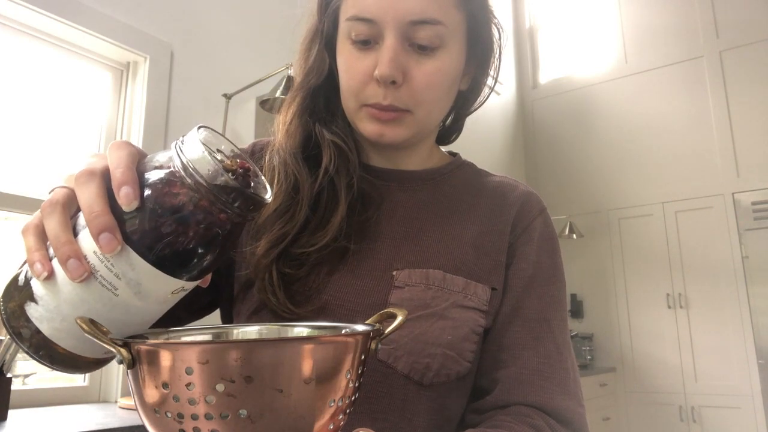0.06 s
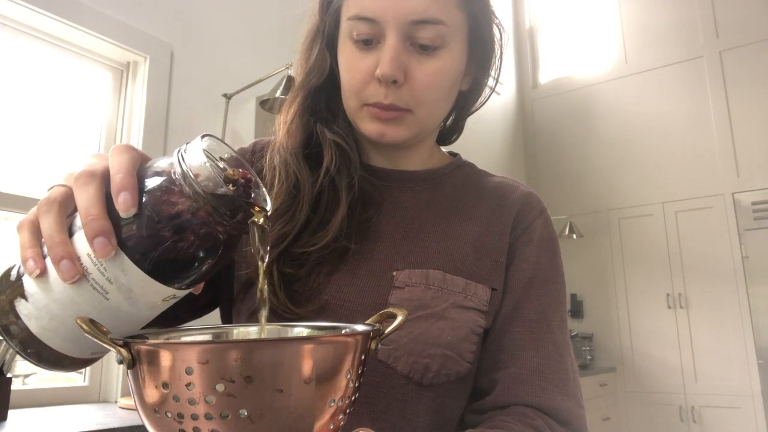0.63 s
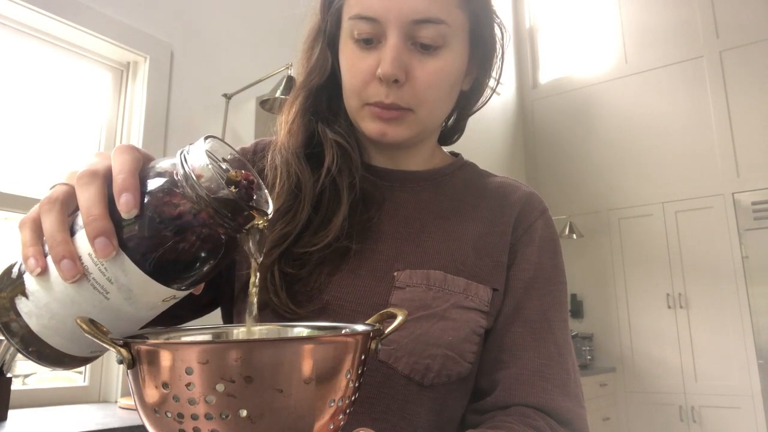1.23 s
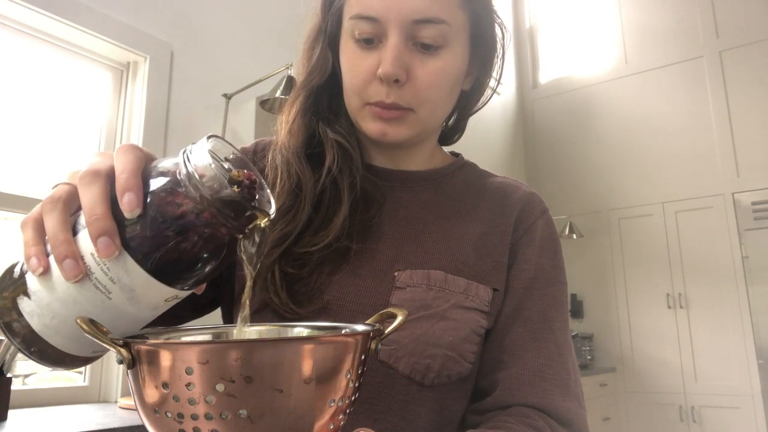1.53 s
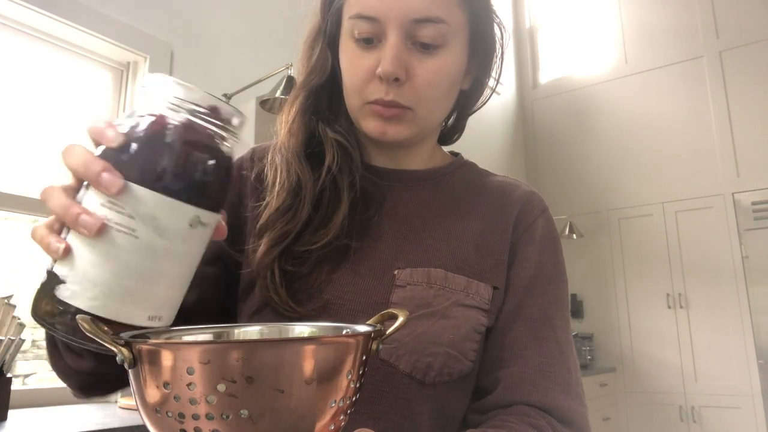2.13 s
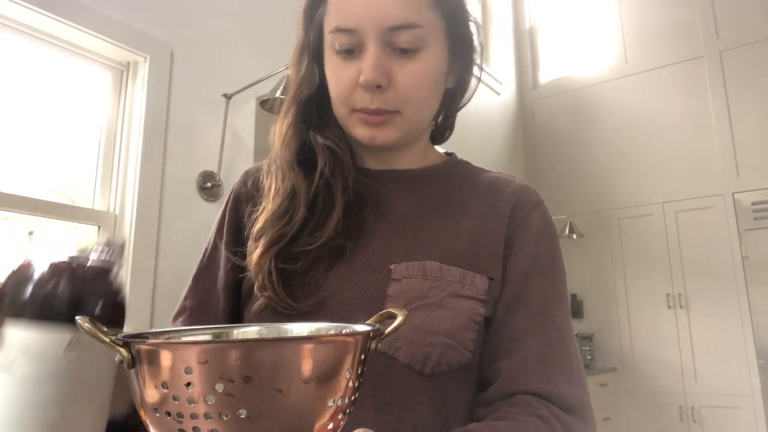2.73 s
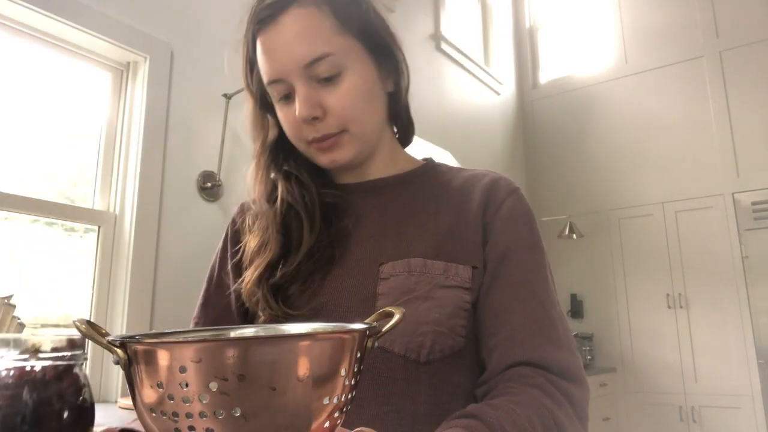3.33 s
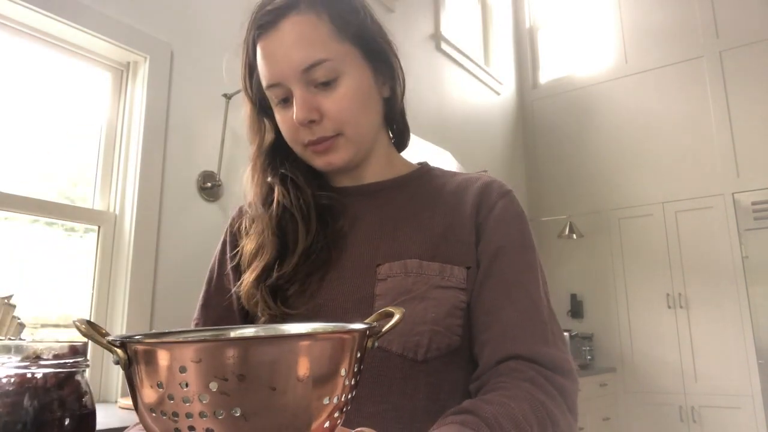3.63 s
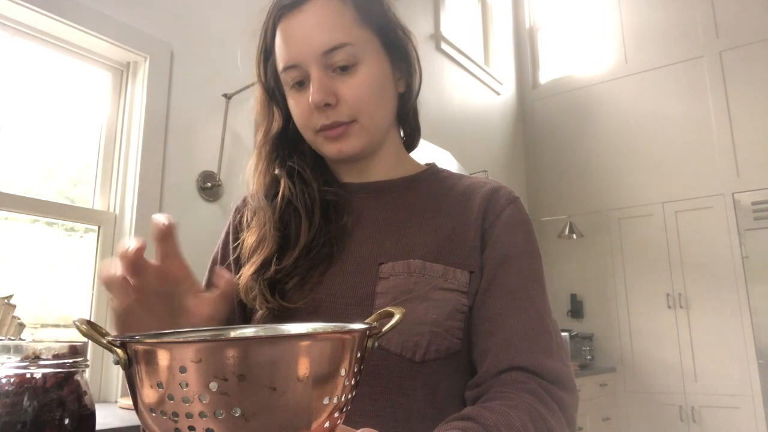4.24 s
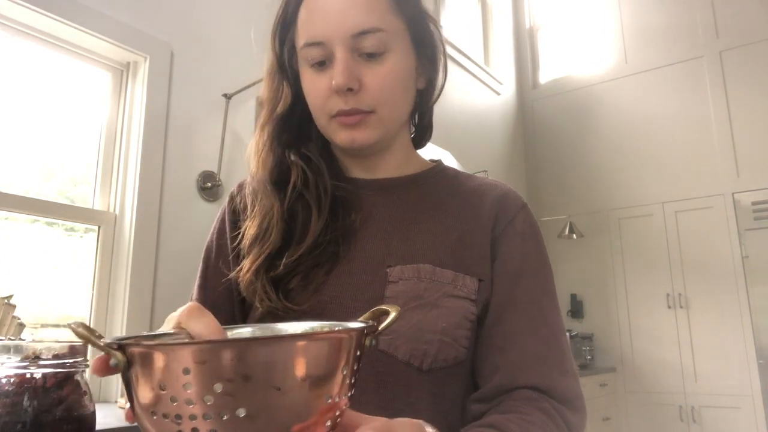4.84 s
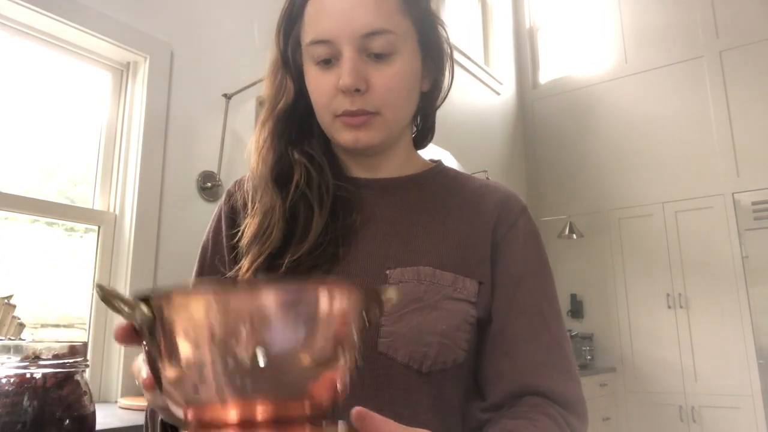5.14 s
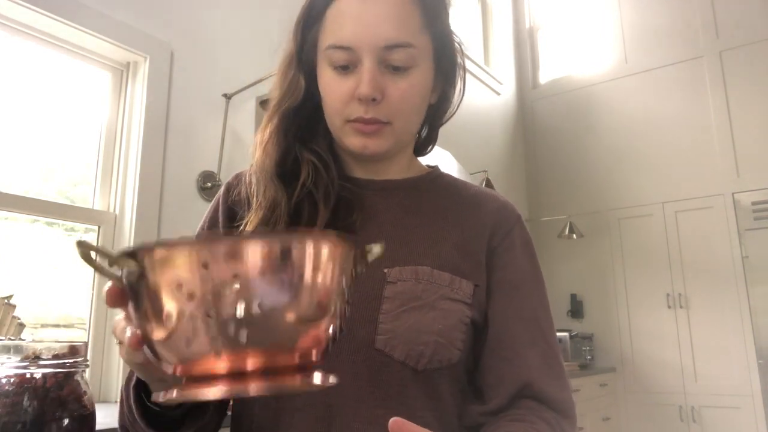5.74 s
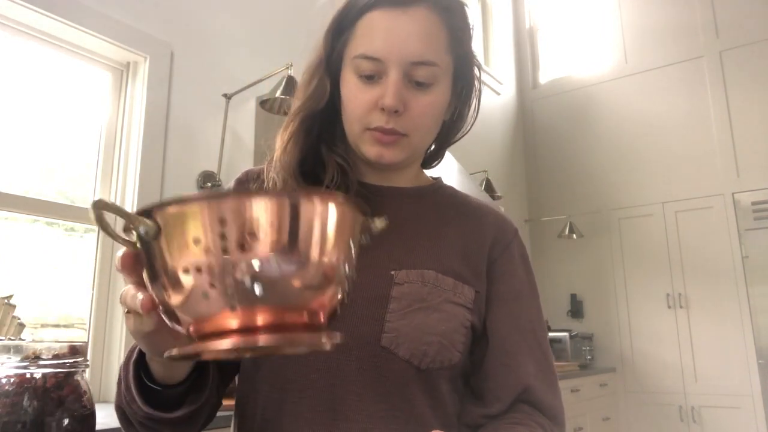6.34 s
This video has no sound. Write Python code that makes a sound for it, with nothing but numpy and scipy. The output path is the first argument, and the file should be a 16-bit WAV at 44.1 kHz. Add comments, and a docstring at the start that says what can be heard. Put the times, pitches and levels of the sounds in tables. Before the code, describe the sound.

In an echoing kitchen with a faint ventilation rumble, liquid trickles onto the wet bottom of a metal colander near the microphone, spattering and dwindling to drips. A glass jar clinks against the rim. After a short pause comes the loudest sound, a sharp wooden knock with a rattle and a softer thud. Fingers then tap and clink softly on the colander as it is picked up.

```python
"""A thin stream patters on a copper colander in a high, echoing kitchen, then thins to drops and plinks.
Poured from a jar, it drums on the wet bottom, throws spray and traps bubbles that snap and ring.
The jar bumps the rim as it is tipped back, ringing the wall and rocking the bowl.
Something knocks hard on wood; then the colander is grasped and lifted off with light clinks.
Ventilation rumbles faintly underneath."""
import sys
import numpy as np
from scipy import signal
from scipy.fft import rfft, irfft, next_fast_len
from scipy.io import wavfile

SR = 44100
rng = np.random.default_rng(int(sys.argv[2]) if len(sys.argv) > 2 else 0)


def to_wav(sig):
    """Store sig (one row per channel, or 1-D mono) as 16-bit WAV at the path in sys.argv[1].

    Samples outside -1..1 are clipped; the rate is SR.
    """
    pcm = np.clip(np.atleast_2d(sig), -1, 1) * 32767
    pcm = np.round(pcm).astype(np.int16)
    wavfile.write(sys.argv[1], SR, pcm.T)  # frames by channels


N = 289737
TIME_S = np.arange(N) / SR
AGE_S = TIME_S[:SR // 2]  # since a contact
POUR_S = TIME_S[:5 * SR // 2]  # while liquid falls
WET_DAMPING = 4.5  # the liquid film divides ring times by this

# fat lumps landing (time [s], splat peak [dB], thump peak [dB])
LUMP_HITS = [(0.544, -37, -37), (0.764, -47, -39), (0.814, -39.5, -43), (0.833, -42, -44),
             (0.857, -57, -37), (0.892, -37.5, -46), (0.902, -41, -51), (0.976, -48, -45),
             (1.011, -37.5, -36.5), (1.036, -47, -50), (1.055, -42.5, -42), (1.07, -48, -49),
             (1.171, -42, -49), (1.199, -42.5, -37), (1.24, -43.5, -58), (1.304, -43.5, -46),
             (1.5713, -39.5, -45), (1.682, -36, -39)]
# single drops landing (time [s], level [dB])
DROP_HITS = [(0.5088, -53.5), (0.542, -54.5), (1.342, -53), (1.401, -52), (1.417, -41.5), (1.437, -36.5),
             (1.5126, -45), (1.536, -42.5), (1.556, -49), (1.572, -44.5), (1.6134, -44), (1.63, -46),
             (1.669, -45), (1.681, -39), (1.757, -55), (1.861, -48)]
# lowest bottom mode, sinking under the liquid's weight (time [s], frequency [Hz])
LOADED_MODE = [(0.5, 1610), (1.34, 1594), (1.45, 1552), (1.62, 1524), (1.82, 1556)]
# higher bottom modes (frequency [Hz], level [dB], t60 [s])
BOTTOM_MODES = [(2930, -8, .02), (3190, 0, .03), (4030, -5, .035), (4960, -2, .042), (5700, -11, .04),
                (7210, -6, .08), (7390, -1, .13), (7616, 2, .085), (8380, -2, .08), (9750, -5, .04),
                (11200, -7, .035), (12600, -7, .025)]
# copper wall modes (frequency [Hz], level [dB], t60 [s])
WALL_MODES = [(307, -3, .5), (882, -9, .42), (1008, -4.5, .55), (1390, -1, .16), (1535, 3, .2),
              (1733, -10, .25), (2202, -2, .24), (2510, -3, .2), (3105, -5, .12), (3275, -2.5, .24),
              (3680, -5, .2), (4062, -1, .18), (4960, 0.5, .17), (5120, -8, .09), (5870, -14, .13),
              (7290, -7, .15), (7605, -5, .13), (8490, -12, .13), (9150, -6, .13), (10200, -9, .13),
              (11920, -12, .13)]


def stream():
    """Dense impacts drum on the wet metal, ring the bottom and throw spray, all following the flow."""
    # swell and break-off of the pour (time [s], patter [dB], spray [dB], lowest mode [dB])
    pour_levels = [(0.64, -80, -98, -82), (0.725, -55, -78, -85), (0.87, -55.5, -69.5, -69),
                   (1.2, -54, -71, -77), (1.36, -56.5, -69.5, -64.5), (1.46, -59, -69, -66),
                   (1.68, -55.5, -61, -66), (1.85, -59.5, -79, -86), (2.0, -96, -96, -81)]
    # spectra of impacts, small lumps, spray and mist (frequency [Hz], level [dB])
    patter_eq = [(120, -26.5), (230, -11), (335, 1.5), (420, -3.5), (700, -9), (920, -17), (1080, -13),
                 (1550, -17.5), (1900, -35), (3200, -29), (6000, -39.5)]
    spatter_eq = [(500, -11), (1100, 17), (1600, -2), (2100, -11), (3200, 4), (5000, -10), (8000, -27),
                  (15000, -34)]
    spray_eq = [(800, -6), (2000, 0), (3300, 9), (4400, 10), (5100, 13), (6500, -2), (7600, 0), (8700, -8),
                (10000, -1), (15500, 3)]
    mist_eq = [(3000, -44), (6500, -19), (7600, -25), (8800, -10), (10000, 3), (15500, 7)]
    times_s, *levels_db = np.transpose(pour_levels)
    flow_gain, spray_gain, ring_gain = (amp(np.interp(POUR_S, times_s, db)) for db in levels_db)
    patter = unit_rms(colour(grains(per_s=800, spread_db=2), patter_eq))
    spatter = unit_rms(colour(puffs(per_s=64, spread_db=1.5, t60_s=0.0098), spatter_eq))
    spray = unit_rms(colour(fizz(per_s=900, spread_db=2.8, q=9), spray_eq))
    mist = unit_rms(colour(fizz(per_s=380, spread_db=6, q=8.4), mist_eq))
    impacts = grains(per_s=250, spread_db=-5)
    low_hz = np.interp(POUR_S, *np.transpose(LOADED_MODE))
    low_ring = unit_rms(excite(impacts, fade(t60_s=0.074)) * glide(low_hz))
    high_ring = unit_rms(excite(impacts, strike(BOTTOM_MODES, scatter_db=4, t60_scale=1.3)))
    body = flow_gain * (amp(3) * patter + amp(-9.5) * spatter)
    treble = spray_gain * (amp(-3) * spray + amp(-1.5) * ticks() + amp(-8) * mist + amp(-11) * high_ring)
    return np.pad(necking() * (body + treble + ring_gain * low_ring), (0, N - len(POUR_S)))


def grains(per_s, spread_db, count=6000):
    """Tiny impacts of random time, size and sign."""
    gaps = rng.exponential(1, count)
    sizes = np.minimum(rng.exponential(1, count), 4)
    hits = amp(spread_db * sizes) * rng.choice([-1, 1], count)
    starts = (np.cumsum(gaps) / per_s * SR).astype(int)
    heard = starts < len(POUR_S)
    return np.bincount(starts[heard], hits[heard], len(POUR_S)) + 1e-18


def puffs(per_s, spread_db, t60_s, count=400):
    """Short noise splashes of uneven spacing and size."""
    starts = (np.cumsum(rng.gamma(2, 0.5, count)) / per_s * SR).astype(int)
    gains = amp(spread_db * np.clip(rng.standard_normal(count), -2, 2))
    hits = np.bincount(starts, gains, len(POUR_S))[:len(POUR_S)]
    return excite(hits, fade(t60_s)) * rng.standard_normal(len(hits))


def fizz(per_s, spread_db, q):
    """Tiny bubbles burst, each ringing a few cycles at one of many pitches."""
    pitches_hz = np.geomspace(1800, 15000, 24)
    return sum(resonate(grains(per_s / len(pitches_hz), spread_db), hz, hz / q) / np.sqrt(hz)
               for hz in pitches_hz)


def ticks():
    """Flung droplets land on the wet metal in a crisp, uneven run."""
    # droplet spectrum (frequency [Hz], level [dB])
    tick_eq = [(1500, -20), (2200, -4), (3000, 2), (4000, -2), (5500, 0), (6700, -6), (8500, -12),
               (10000, -3), (15500, -2)]
    landings = colour(puffs(per_s=60, spread_db=2.5, t60_s=0.0054), tick_eq)
    return unit_rms(with_modes(landings, BOTTOM_MODES, WET_DAMPING, ring_db=7))


def necking(length_s=0.011, depth_db=1):
    """Gain of a stream that pinches in ahead of each lump or drop."""
    pinch = sum(np.interp(POUR_S - s, [-length_s, -length_s / 2, 0], [0, 1, 1], right=0)
                for s, *_ in [*LUMP_HITS, *DROP_HITS])
    return amp(-depth_db * np.minimum(pinch, 1))


def lumps():
    """Fat lumps splat with a metallic tinge; the wet bottom thumps."""
    out = np.zeros(N)
    for s, splat_db, thump_db in LUMP_HITS:
        splat = (AGE_S == 0) + amp(-7) * burst(t60_s=0.016) + amp(-17) * burst(t60_s=0.07)
        splat -= 0.8 * resonate(splat, hz=2010, width_hz=2200)  # weak response between modes
        splat = with_modes(splat, BOTTOM_MODES[:5], WET_DAMPING, ring_db=3.5)
        add(out, s, amp(splat_db) * unit_peak(highpass(lowpass(splat, hz=1730), hz=646)))
        thump_hz = 338 * (1 + 0.032 * rng.standard_normal())
        add(out, s, amp(thump_db) * mode_ring(thump_hz, t60_s=0.072, rise_s=0.0036))
    return out


def bubbles():
    """Small bubbles snap; bigger ones, trapped by drips, ring with a settling pitch."""
    # tiny bubbles (time [s], peak [dB], frequency [Hz])
    snaps = [(0.7327, -49, 13800), (0.7911, -50, 13000), (0.8994, -50, 13100), (0.944, -37.5, 10000),
             (0.9756, -46, 11300), (1.0335, -46, 12900), (1.057, -53, 12000), (1.133, -49, 15100),
             (1.188, -50, 15800), (1.2187, -56, 9750), (1.243, -51, 15000), (1.288, -51.5, 8500),
             (1.4147, -52, 13500), (1.438, -40.5, 11200), (1.481, -48, 9900), (1.535, -48, 9900),
             (1.562, -52, 12000), (1.612, -56, 9720), (1.631, -38, 14500), (1.657, -46, 9300),
             (1.6812, -39, 13400), (1.867, -50, 9000), (1.898, -46, 10300), (1.972, -55, 6800),
             (2.589, -52, 11700), (3.977, -51, 7060), (6.501, -55, 8600)]
    # trapped bubbles (time [s], level [dB], frequency [Hz], t60 [s])
    plinks = [(0.606, -41, 1010, 0.049), (1.351, -41, 5650, 0.02), (1.695, -33, 2500, 0.072),
              (1.699, -41, 4000, 0.045), (1.8451, -35, 2600, 0.078), (1.886, -41, 6060, 0.014),
              (1.972, -42.5, 2572, 0.047), (2.003, -51, 2600, 0.041), (2.050, -41.5, 2110, 0.046),
              (2.0922, -38, 2380, 0.027), (2.094, -50, 4160, 0.074), (2.099, -46, 2760, 0.12),
              (2.147, -45, 4000, 0.043), (2.245, -58, 4140, .05), (2.267, -49, 2650, 0.082),
              (2.349, -55, 4120, 0.046), (2.475, -60, 2640, .05), (3.092, -47.5, 9120, 0.046)]
    out = np.zeros(N)
    for s, db, hz in snaps:
        snap = burst(t60_s=0.015) + amp(-8) * burst(t60_s=0.083)
        add(out, s, amp(db) * unit_peak(resonate(snap, hz, width_hz=2800)))
    for s, db, hz, t60_s in plinks:
        tone = glide(hz * (1 + 0.07 * fade(t60_s=0.014))) * fade(t60_s) * (1 - fade(t60_s=0.022))
        splash = amp(2.5) * resonate(burst(t60_s=0.051), hz, width_hz=360)
        add(out, s, amp(db) * (tone + splash))
    return out


def drops_and_berry():
    """Soft drops ring the bottom; one hard berry lands and bounces once."""
    out = np.zeros(N)
    for s, db in DROP_HITS:
        add(out, s, amp(db) * bottom_hit(s, contact_hz=2300, splash_db=-20))
    for s, db in [(1.8192, -36), (1.8226, -46)]:
        add(out, s, amp(db) * bottom_hit(s, contact_hz=14500, splash_db=8, t60_scale=0.71))
    return out


def bottom_hit(s, contact_hz, splash_db, t60_scale=1):
    """The loaded bottom rings with a splash; moving liquid detunes its lowest mode."""
    hz = np.interp(s, *np.transpose(LOADED_MODE)) * (1 + 0.011 * rng.standard_normal())
    low_ring = glide(hz * (1 + 0.0048 * fade(t60_s=0.066))) * fade(0.14 * t60_scale)
    splash = highpass(burst(t60_s=0.031) + amp(-19.5) * burst(t60_s=0.37), hz=4500)
    high_ring = strike(BOTTOM_MODES, scatter_db=0, t60_scale=t60_scale)
    return lowpass(low_ring + high_ring + amp(splash_db) * splash, contact_hz)


def touches():
    """Jar, fingers and nails click on the colander, ring its wall and set it rocking."""
    # contacts (time [s], ring level [dB], lowest excited [Hz], highest excited [Hz],
    # t60 scale from the grip [ratio], click re ring [dB], thud peak [dB], thud frequency [Hz])
    contacts = [(2.128, -49.5, 830, 2600, 0.61, 18.5, -32.5, 286),
                (2.1308, -56, 5100, 5200, 0.83, 20.5, -39, 381), (2.17, -62, 4770, 5200, 1.1, 7, -52, 208),
                (2.183, -51, 304, 1100, 1.25, 16, -46, 299), (2.203, -64, 4920, 7600, 1.6, -2, -40, 321),
                (4.494, -66, 2330, 2700, 1, 1, -38, 218.4), (4.565, -59, 2500, 9450, 1.35, 1, -48.5, 349.5),
                (4.622, -57.5, 1210, 1360, 0.51, 21.5, -44, 197),
                (4.829, -51.5, 1260, 1390, 0.76, 22, -39.5, 305),
                (4.8735, -49, 1530, 2050, 0.53, 6, -32.5, 351),
                (4.8744, -51.5, 3060, 3130, 0.54, 13.5, -51, 360),
                (4.874, -58.5, 5200, 8600, 0.54, 10.5, -37.5, 339),
                (4.917, -68, 1520, 3180, 1.5, 7, -40.5, 202), (4.985, -64, 1400, 3200, 0.48, 8, -40, 393),
                (4.999, -54.5, 1530, 1700, 0.37, 11, -43.5, 312)]
    thud_lag_s = 0.00305
    out = np.zeros(N)
    for s, db, low_hz, high_hz, t60_scale, click_db, thud_db, thud_hz in contacts:
        ring = strike(WALL_MODES, scatter_db=2.5, t60_scale=t60_scale)
        click = amp(click_db) * burst(t60_s=0.057)
        add(out, s, amp(db) * contact_band(ring + click, low_hz, high_hz))
        add(out, s + thud_lag_s, amp(thud_db) * rocking(thud_hz, t60_scale))
    return out


def rocking(first_hz, t60_scale, gap_s=0.025, loss_db=14, pitch_ratio=0.74):
    """The bowl thuds on the vessel under it, then settles with a weaker, lower thud."""
    out = np.zeros(N)
    for k in range(2):
        hz = first_hz * pitch_ratio ** k
        noise = amp(11.5) * lowpass(rng.standard_normal(len(AGE_S)), hz=505)
        envelope = fade(0.15 * t60_scale * (1 + k)) * (1 - fade(t60_s=0.019))
        thud = highpass(lowpass((sine(hz) + noise) * envelope, hz * 1.7), hz / 2)
        add(out, k * gap_s, amp(-k * loss_db) * unit_peak(thud))
    return out


def foot_click():
    """The colander's foot clicks as it comes free."""
    # foot modes (frequency [Hz], level [dB], t60 [s])
    foot_modes = [(2600, -3.5, 0.0057), (3170, 1.5, 0.033), (3340, 2.5, 0.013), (3830, -7.5, 0.017),
                  (5070, -17, 0.039), (6200, -15.5, 0.019)]
    out = np.zeros(N)
    add(out, s=5.303, sound=amp(-36) * unit_peak(strike(foot_modes, scatter_db=0)))
    return out


def scuffs(slips_per_s=1400):
    """Jar and fingers slide over the metal: tiny slips sound the hand-damped wall."""
    # slides (time [s], length [s], level [dB], lowest excited [Hz], highest excited [Hz])
    slides = [(2.154, 0.075, -63, 4600, 13000), (2.15, 0.11, -56, 850, 2280),
              (4.467, 0.064, -69, 2380, 4150), (4.942, 0.11, -65.5, 1200, 5560)]
    out = np.zeros(N)
    for s, length_s, db, low_hz, high_hz in slides:
        slips = rng.standard_normal(len(AGE_S)) * (rng.random(len(AGE_S)) < slips_per_s / SR)
        rub = contact_band(with_modes(slips, WALL_MODES, damping=4.4, ring_db=18), low_hz, high_hz)
        stroke = np.sin(np.pi * np.minimum(AGE_S / length_s, 1))
        add(out, s, amp(db) * stroke * unit_rms(rub))
    return out


def knocks():
    """A hard knock on a wooden panel, a short rattle and a soft second landing."""
    # faint, dull, grainy noise just before the knock; then knock, rattle and landing
    # (time [s], peak [dB], cut-off [Hz], graininess [0-1])
    events = [(3.476, -31, 1200, .4), (3.489, -9, 4500, 0.08), (3.501, -34, 2200, 0.2),
              (3.526, -25.5, 1410, 0.5), (3.538, -25, 1200, .5), (3.568, -36.5, 1700, .8),
              (3.585, -25.5, 1410, .6), (3.6956, -24.5, 700, .12), (3.716, -37, 660, 0.25)]
    # knock spectrum (frequency [Hz], level [dB])
    crack_eq = [(50, -27.5), (110, -16), (180, -4), (550, 2), (1100, 0), (1500, -2.5), (2000, -4),
                (2300, -13), (2700, -17), (3500, -26), (4100, -26), (6500, -37.5), (15000, -37)]
    # panel resonances (frequency [Hz], width [Hz], level [dB])
    wood_modes = [(185, 45, 2.5), (292, 35, 5.5), (350, 45, -2), (470, 70, -3.5), (590, 100, -1.5),
                  (700, 50, -6), (790, 70, -5.5), (888, 40, -5), (1038, 50, -4), (1190, 80, -7),
                  (1310, 80, 0), (1430, 60, -3), (1558, 70, -1), (1890, 140, -3.5), (2190, 110, -10),
                  (2410, 90, -8)]
    out = np.zeros(N)
    crack = disperse(colour(1.0 * (AGE_S == 0), crack_eq), hz=1170, stages=12)
    panel = crack + sum(amp(db) * resonate(crack, hz, width_hz) for hz, width_hz, db in wood_modes)
    for s, db, cutoff_hz, graininess in chatter(events):
        drive = (AGE_S == 0) + graininess * burst(t60_s=0.05)
        add(out, s, amp(db) * unit_peak(lowpass(excite(drive, panel), cutoff_hz)))
    # a soft low boom swells just after the knock
    boom = amp(-42.5) * mode_ring(hz=66, t60_s=0.97, rise_s=0.1)
    for s, db, *_ in events:
        add(out, s, amp(db) * boom)
    rattle_ring = amp(-28) * mode_ring(hz=884, t60_s=0.23, rise_s=0.016)
    add(out, s=3.5, sound=rattle_ring)
    return out


def chatter(events, first_gap_s=0.0044, slowing=1.6, loss_db=23.5, cutoff_ratio=0.35):
    """Each event repeats twice, ever weaker and duller."""
    return [(s + first_gap_s * k ** slowing, db - k * loss_db, hz * cutoff_ratio ** k, graininess)
            for s, db, hz, graininess in events for k in range(3)]


def disperse(x, hz, stages):
    """Bending waves in a panel: highs arrive first, lows milliseconds later."""
    r = np.exp(-2 * np.pi * hz / SR)
    return signal.sosfilt(np.tile([-r, 1, 0, 1, -r, 0], (stages, 1)), x)


def kitchen(x, delay_s=0.004, build_s=0.014):
    """Diffuse echo builds from the near walls; deep bass and top treble die first."""
    # reverberation (frequency [Hz], t60 [s])
    room_decay = [(100, 0.28), (400, 0.69), (1300, 1), (2600, 0.79), (6000, 1), (15000, 0.5)]
    t = TIME_S[:SR]
    white, hz = rfft(rng.standard_normal(SR)), np.fft.rfftfreq(SR, 1 / SR)
    edges_hz = np.geomspace(40, 20000, 13)
    tail = np.zeros(SR)
    for low, high in zip(edges_hz, edges_hz[1:]):
        band = irfft(white * ((hz >= low) & (hz < high)), SR)
        tail += band * np.exp(-np.log(1000) * t / at_hz(room_decay, np.sqrt(low * high)))
    tail = lowpass(tail * np.clip((t - delay_s) / build_s, 0, 1), hz=10000)
    return signal.fftconvolve(x, tail / np.sqrt(np.sum(tail ** 2)))[:N]


def ventilation(hum_hz=589.8, width_hz=7):
    """Steady rumble with a faint, wavering hum."""
    # room air spectrum (frequency [Hz], level [dB])
    air_eq = [(15, -42), (25, -35), (97, -0.5), (145, -7), (195, -0.5), (293, -6), (326, -11), (354, -4),
              (416, -11.5), (591, -11.5), (641, -13), (1890, -28), (8590, -33.5), (9320, -37),
              (16000, -39.5)]
    rumble = colour(rng.standard_normal(N), air_eq)
    hum = resonate(resonate(rng.standard_normal(N), hum_hz, width_hz), hum_hz, width_hz)
    return amp(-55.5) * unit_rms(rumble) + amp(-70.5) * unit_rms(hum)


def strike(modes, scatter_db, t60_scale=1):
    """Struck modes of alternating sign, each level scattered at random."""
    return sum((-1) ** k * amp(db + scatter_db * rng.standard_normal()) * sine(hz) * fade(t60_s * t60_scale)
               for k, (hz, db, t60_s) in enumerate(modes))


def with_modes(x, modes, damping, ring_db):
    """A splash or rub plus the damped metal modes it sounds."""
    return x + sum(amp(ring_db + db) * resonate(x, hz, damping * np.log(1000) / (np.pi * t60_s))
                   for hz, db, t60_s in modes)


def contact_band(x, low_hz, high_hz):
    """Place and softness of a contact limit the modes it reaches."""
    return colour(x, [(low_hz / 3, -34), (low_hz, 0), (high_hz, 0), (high_hz * 1.55, -30)])


def mode_ring(hz, t60_s, rise_s):
    """One decaying tone with a soft onset."""
    return sine(hz) * (fade(t60_s) - fade(rise_s))


def sine(hz):
    """Steady tone from a contact on."""
    return np.sin(2 * np.pi * hz * AGE_S)


def glide(hz):
    """Tone following a pitch curve."""
    return np.sin(2 * np.pi * np.cumsum(hz) / SR)


def fade(t60_s):
    """Exponential decay after a contact."""
    return np.exp(-np.log(1000) * AGE_S / max(t60_s, 1e-3)) + 1e-12


def burst(t60_s):
    """Decaying noise: modes too close to tell apart."""
    return rng.standard_normal(len(AGE_S)) * fade(t60_s)


def excite(hits, ring):
    """Every hit sets off the same ring."""
    return signal.fftconvolve(hits, ring)[:len(hits)]


def resonate(x, hz, width_hz):
    """One resonance, unit peak gain."""
    r = np.exp(-np.pi * width_hz / SR)
    numerator = np.array([1, 0, -1]) * (1 - r * r) / 2
    return signal.lfilter(numerator, [1, -2 * r * np.cos(2 * np.pi * hz / SR), r * r], x)


def colour(x, eq):
    """Minimum-phase filter through (frequency [Hz], level [dB]) points."""
    size = 2 * next_fast_len(len(x))
    cepstrum = irfft(np.log(amp(at_hz(eq, np.fft.rfftfreq(size, 1 / SR)))))
    cepstrum[1:size // 2] *= 2
    cepstrum[size // 2 + 1:] = 0
    return irfft(rfft(x, size) * np.exp(rfft(cepstrum)))[:len(x)]


def lowpass(x, hz):
    """Second-order low-pass, as of a soft contact."""
    return signal.sosfilt(signal.butter(2, min(hz, 0.45 * SR), fs=SR, output="sos"), x)


def highpass(x, hz):
    """Second-order high-pass."""
    return signal.sosfilt(signal.butter(2, hz, "high", fs=SR, output="sos"), x)


def at_hz(points, hz):
    """Read a table on a log-frequency axis."""
    points_hz, values = np.transpose(points)
    return np.interp(np.log(np.maximum(hz, 1)), np.log(points_hz), values)


def amp(db):
    """Decibels to gain."""
    return 10 ** (np.asarray(db) / 20)


def unit_rms(x):
    """Scale to rms 1."""
    return x / np.sqrt(np.mean(x ** 2) + 1e-20)


def unit_peak(x):
    """Scale to peak 1."""
    return x / np.max(np.abs(x))


def add(out, s, sound):
    """Mix a sound in at time s."""
    start = int(s * SR)
    out[start:start + len(sound)] += sound[:N - start]


def scene():
    """The pour is close; the knock fills the room with its lower notes."""
    liquid = stream() + lumps()
    drips = bubbles()
    metal = drops_and_berry() + touches() + foot_click() + scuffs()
    wood = knocks()
    send = amp(-12.5) * liquid + amp(-14.5) * drips + amp(-15.5) * metal
    send += amp(-9.5) * lowpass(wood, hz=2500)
    return (liquid + drips + metal + wood + kitchen(send) + ventilation())[None]


def record(dry):
    """Cut the deepest bass and the very top."""
    top_cut = signal.ellip(10, 0.1, 70, 15950, fs=SR, output="sos")
    return signal.sosfilt(top_cut, highpass(dry, hz=33.6))


dry = scene()
out = record(dry)
to_wav(out)
```